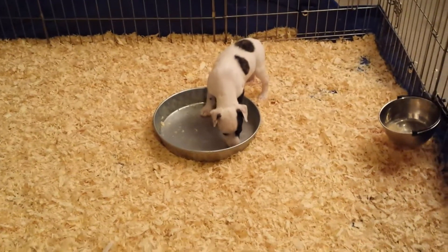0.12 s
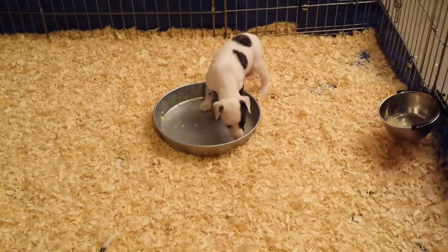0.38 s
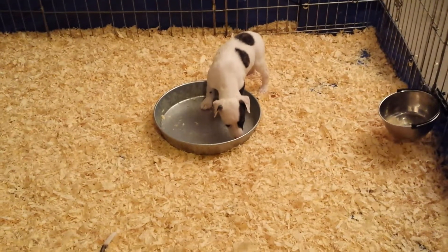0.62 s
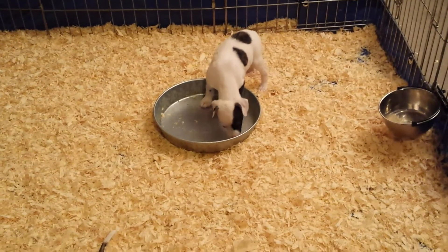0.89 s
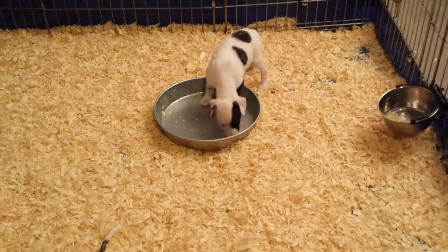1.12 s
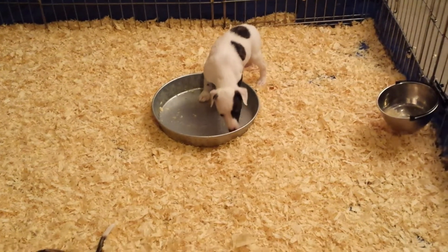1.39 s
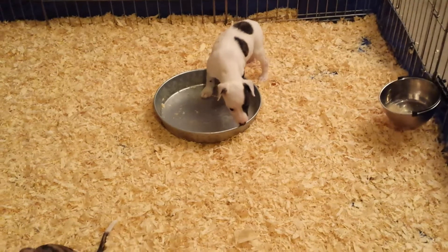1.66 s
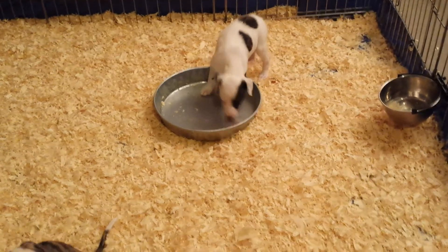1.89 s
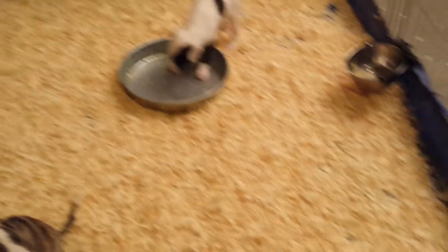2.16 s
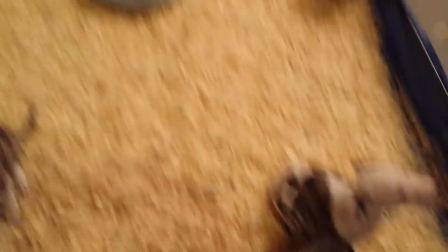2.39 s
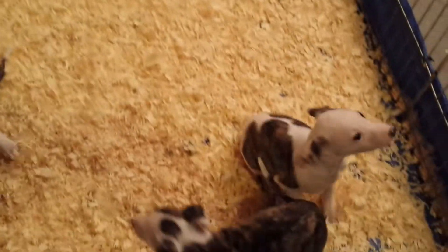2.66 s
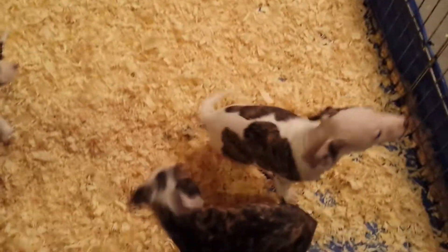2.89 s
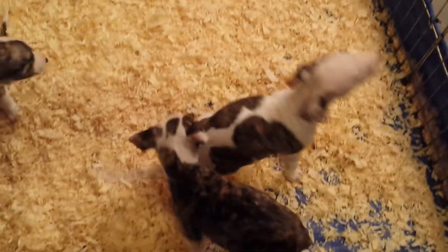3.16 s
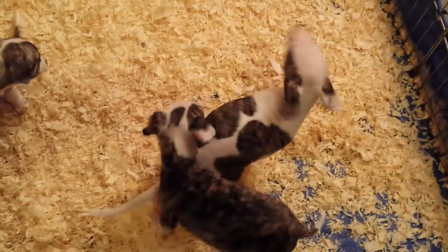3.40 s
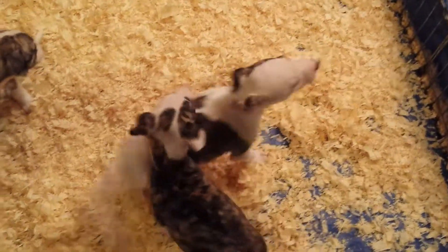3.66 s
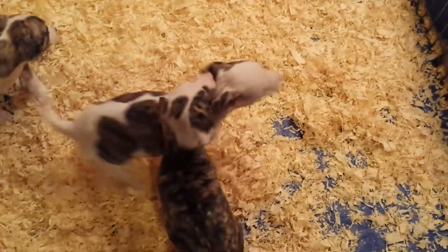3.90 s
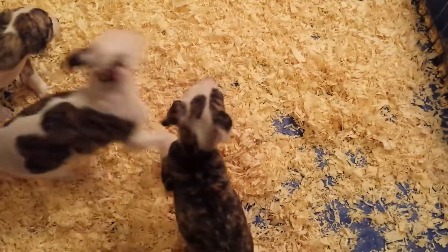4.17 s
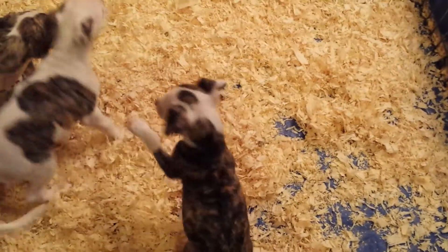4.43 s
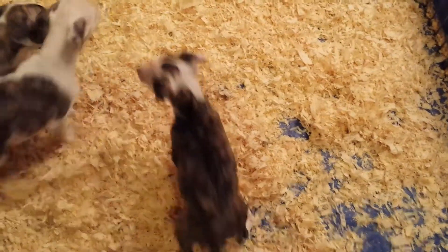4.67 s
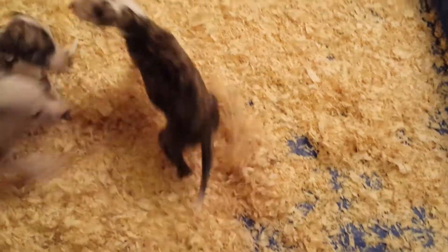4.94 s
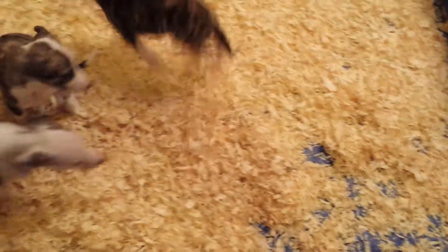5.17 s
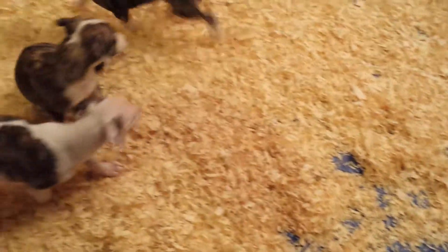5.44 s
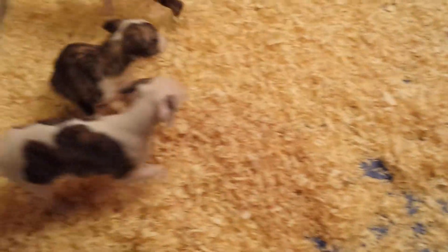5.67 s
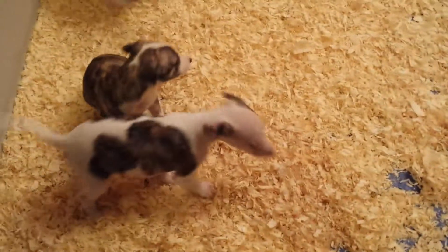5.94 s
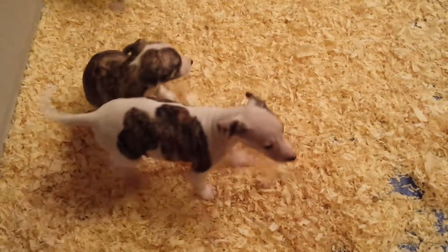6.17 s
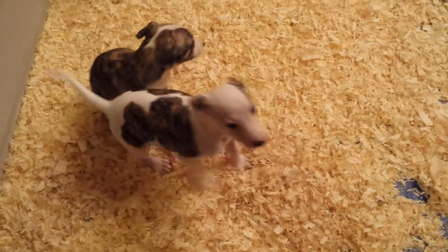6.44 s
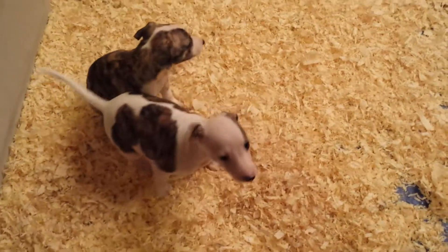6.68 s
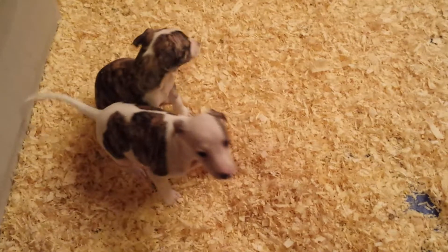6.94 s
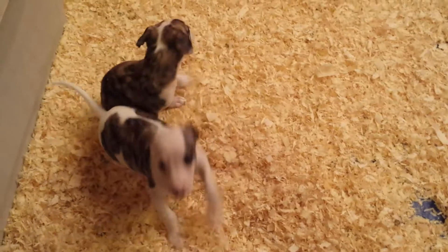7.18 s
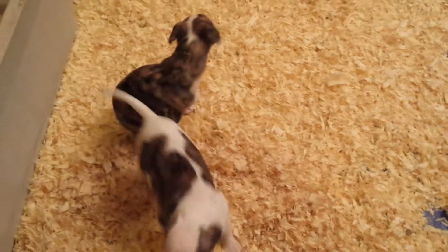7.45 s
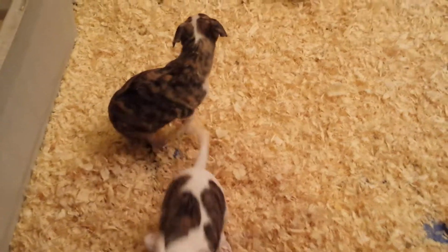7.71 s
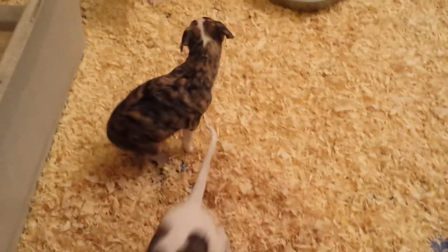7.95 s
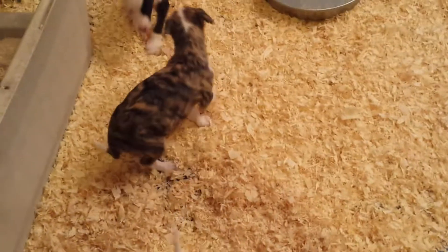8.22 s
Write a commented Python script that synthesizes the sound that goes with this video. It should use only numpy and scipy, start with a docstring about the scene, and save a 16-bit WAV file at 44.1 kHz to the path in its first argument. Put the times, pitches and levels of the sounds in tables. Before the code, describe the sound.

Crackly paw steps and sliding bodies on wood shavings, with a faint low room rumble. A hand bumps the microphone sharply, then puppies let out brief, high, bending whimpers, some hoarse. A scuffle brings soft thumps and a short grunt; two clusters of whines follow over nearer rustling, closing with a sudden crisp landing. Indoors, close and lightly reverberant.

```python
"""Indoors, in a wire pen: puppies whine in short squeaky notes while paws rustle and crunch dry wood shavings.
Voices are gliding harmonic series shaped by mouth and throat resonances, with a decaying room response.
Shavings are random impulses in filtered bands; slides of bodies or a sleeve and the floor are coarser and lower.
Body thumps and the partials of one short grunt are damped sines; a hand on the recorder adds knocks at the
right microphone, and ticks are single clicks with a damped ring, the loudest of them on the right."""
import sys
import numpy as np
from scipy import signal
from scipy.io import wavfile

SR = 44100
rng = np.random.default_rng(int(sys.argv[2]) if len(sys.argv) > 2 else 0)


def level_to_linear(level):
    """Convert decibel levels to linear amplitude factors, elementwise."""
    exponent = np.asarray(level, float) / 20
    return 10 ** exponent


def int16_out(signal):
    """Quantize to a 16-bit WAV file."""
    q = np.round(np.clip(np.atleast_2d(signal).T, -1, 1) * 32767)
    wavfile.write(sys.argv[1], SR, q.astype(np.int16))


N = 367353

# Floor and handling rumble: t/s, level/dB, low weight/(dB per octave), left-right difference/dB
RUMBLE = [(0, -64, 3, 0), (1.6, -59.5, 1.5, 1.5), (2.1, -63.5, 5, -6), (2.37, -50, -3, -12),
          (2.55, -61.5, 6.5, -13.5), (2.99, -47.5, -2.5, -16), (3.25, -61.5, 3, -3), (4.1, -59, 2, -5),
          (4.9, -57, 0.5, -5.5), (5.9, -55, 1, 2.5), (6.8, -58.5, 4, -2), (7.1, -55, 8.5, -0.5),
          (7.45, -55, 6.5, 0), (7.8, -56.5, 3.5, -2), (8.33, -47.5, 1.5, 2)]
# Rumble spectrum: f/Hz, relative density/dB
RUMBLE_COLOUR = [(25, -25), (38, -13.5), (70, -2.5), (130, -2.5), (240, -1.5), (400, -8), (800, -12)]
HUM_HZ, HUM_WIDTH_HZ, HUM_DB = 242, 7.23, -68.5   # width of each of two cascaded resonators
# Left-right correlation of all banded noise: f/Hz, correlation coefficient/1
LIKENESS = [(60, 0.6593), (290, 0.5398), (640, 0.2895), (1400, 0.0125), (15000, .01)]

# Steady shuffle of bodies on the bedding: t/s, level/dB, left-right difference/dB
SCUFF = [(0, -64.5, -0.5), (.68, -66, -0.5), (.76, -73.5, -2.5), (.91, -65, 0), (1.0, -58.5, 7),
         (1.9, -63, 0.5), (2.2, -66, 0.5), (2.9, -60, -8.5), (3.5, -63.5, 0.5), (3.75, -57.5, 1.5),
         (4.2, -65.5, -3.5), (4.9, -57, 1.5), (5.4, -64, 0), (6.6, -61.5, -1), (7.5, -59, -2),
         (8.18, -56.5, 3.5), (8.33, -48.5, 0)]
# Shuffle spectrum: f/Hz, relative density/dB
SCUFF_COLOUR = [(250, -6), (500, -1), (1000, 0.5), (2400, 1), (3400, -7.5), (4700, -13), (7000, -35.5),
                (12000, -25)]
SCUFF_WEIGHT_DB = 1.5   # dB per octave towards the lows
# Something sliding: bodies on the bedding, or a sleeve rubbing (1.2-1.6 s and 2.3-2.6 s):
# t of peak/s, level/dB, 10 dB fall time/s, low weight/(dB per octave), left-right difference/dB
SLIDES = [(.56, -51, 0.0428, 3, -1.5), (1.23, -49, 0.0996, 1, 14), (1.42, -54.5, 0.1753, 4, 9),
          (2.115, -50, 0.0403, 0.5, 10.5), (2.31, -48.5, 0.0454, -0.5, -9.5), (2.41, -54, 0.0344, 1, -11),
          (2.52, -57, 0.0198, 1, -9), (3.352, -51.5, 0.052, -3.5, 2.5), (6.3, -53.5, 0.5217, 2, 6.5),
          (8.224, -44.5, 0.0252, 4.5, 0)]

# General stir of paws in the shavings: t/s, level/dB
RUSTLE = [(0, -54.5), (.45, -54), (.63, -43.5), (.7, -53), (.77, -65.5), (.92, -55.5), (1.32, -49.5),
          (1.87, -54), (2.1, -49), (2.24, -58), (2.5, -62.5), (2.95, -58), (3.5, -55), (3.7, -52.5),
          (4.05, -55), (4.2, -65.5), (4.5, -58.5), (4.72, -55), (4.8, -45), (4.97, -46.5), (5.4, -54.5),
          (5.75, -54), (5.96, -46), (6.2, -41.5), (6.39, -62), (6.47, -45.5), (6.6, -51), (6.7, -46.5),
          (7.02, -54), (7.14, -48.5), (7.42, -53), (7.6, -50.5), (8.17, -43), (8.33, -48.5)]
# Rustle spectrum: f/Hz, relative density/dB
RUSTLE_COLOUR = [(2500, -7), (4300, -4.5), (5500, -3.5), (6800, 2), (8500, -1), (10500, -0.5),
                 (14000, -6.5), (16000, -7)]
# Single paw steps: t of peak/s, level/dB, 10 dB fall time/s (sign ignored)
STEPS = [(0.136, -48.5, 0.0588), (.25, -44.5, 0.032), (.56, -40.5, -0.0001), (1.23, -53, 0.0566),
         (1.375, -44, 0.0335), (1.69, -46.5, 0.0166), (1.801, -42, -0.0077), (2.135, -47, 0.0216),
         (2.655, -55, -0.007), (2.921, -49.5, 0.061), (3.144, -47, 0.0024), (3.26, -48, 0.0216),
         (3.35, -48.5, 0.0944), (4.255, -51.5, 0.0751), (4.59, -43.5, 0.017), (4.646, -48.5, 0.0432),
         (4.889, -37.5, 0.0278), (4.93, -48, 0.0035), (5.19, -42.5, 0.0009), (5.32, -47, 0.037),
         (5.44, -43, 0.0146), (5.52, -44.5, 0.093), (5.676, -44, 0.0263), (6.07, -51, 0.0856),
         (6.312, -38, 0.0566), (6.41, -50, -0.0404), (6.44, -39.5, 0.0129), (6.871, -42.5, 0.0801),
         (6.955, -50, 0.163), (7.47, -45.5, 0.0858), (7.67, -42.5, 0.0245), (7.718, -44.5, 0.0206),
         (7.9, -46.5, 0.0908), (8.02, -47, 0.0145), (8.165, -39, 0.0088)]
RISE_SHARE = 0.8411   # rise time over fall time of a step or slide
# A pup lands close by
LANDING_S, LANDING_DB, LANDING_FALL_S, LANDING_RISE_SHARE = 8.2, -29, 0.08838, 0.02217
# Nearness of the paws: t/s, level of top sheen relative to the rustle/dB, left-right difference/dB
NEARNESS = [(0, -19.5, 0.5), (.86, -17.5, 4), (2.0, -26, 2), (2.04, 0.5, 1), (2.2, 1, -5.5),
            (2.28, -15, 5.5), (2.62, -20, 7.5), (3.16, -36.5, 4.5), (3.6, -10, 1), (4.5, -1.5, 1),
            (4.7, 6, 0), (5.3, 5.5, -5), (5.75, -1, -1), (5.96, 3.5, 8.5), (6.12, -0.5, 0), (6.8, -7, -6),
            (7.45, -2.5, -5), (8.33, -3, -5)]
SHEEN_PAN_DB = -17   # the sheen sits further right than the body of the rustle
SNAPS_PER_S, SNAP_DB = 50, 12.5   # lone flakes per channel; their gain before filtering

# A paw crushing shavings: t/s, level/dB, left-right difference/dB, rise plus decay time/s, lower band edge f/Hz
CRUNCHES = [(0.513, -46.5, 5, 0.01706, 393.6), (0.534, -34, 5.5, 0.0625, 4450),
            (0.715, -32, 16, 0.020238, 1229), (0.829, -45, 15.5, 0.004794, 1000),
            (0.929, -39.5, 21, 0.03843, 1244), (1.334, -33.5, 10, 0.017, 3466),
            (1.471, -38, 2, 0.04203, 4000), (1.782, -40, 10, 0.01397, 4000),
            (2.258, -44.5, 10.5, 0.01486, 4000), (2.373, -36, -21, 0.02106, 430),
            (2.375, -42.5, -20, 0.01677, 6007), (2.982, -35, -21.5, 0.026024, 713),
            (3.433, -42, 1.5, 0.02652, 1242), (4.568, -43, -4, 0.02942, 1476),
            (4.93, -42.5, 1.5, 0.05786, 301.3), (5.042, -29.5, -10, 0.006076, 4536),
            (6.165, -31, -21, 0.01439, 4000), (7.555, -42, 18, 0.01527, 200), (7.6, -42, 13, 0.01908, 200),
            (8.199, -18, -11, 0.02008, 5295)]
CRUNCH_RISE_SHARE = 0.3488   # of the length

# Bodies thumping on the floor; the group at 4.92-4.98 s is the partials of a short grunt:
# t/s, level/dB, f/Hz, left-right difference/dB, cycles to fall 30 dB/1
THUMPS_AND_GRUNT = [(0.514, -37.5, 623.9, 1.5, 14.5), (3.862, -38, 227.2, 1.5, 18.5),
                    (4.583, -33.5, 605.7, -12, 13), (4.623, -38, 187.7, -2, 16),
                    (4.791, -35.5, 223.7, 3.5, 12.5), (4.793, -39.5, 617.6, 4.5, 16),
                    (4.875, -41.5, 137.9, 1, 11), (4.924, -34.5, 745.5, 3.5, 39.5),
                    (4.932, -40, 1291, 0.5, 40), (4.946, -33.5, 828.5, 5, 45),
                    (4.95, -35.5, 210.4, 3.5, 10.5), (4.955, -36, 423, -4, 25.5),
                    (4.975, -34.5, 415, -1.5, 20.5), (5.335, -42, 228, 1.5, 8.5), (5.353, -34, 204.9, 1, 8),
                    (5.462, -38, 150.2, -9.5, 8), (7.557, -39.5, 191, 15, 14), (7.595, -40, 149.5, 16, 15)]
THUMP_SAG, THUMP_RISE = 0.01775, 0.1422   # share of pitch lost while dying; share of the cycles spent swelling
LOW_CUT_HZ = 45.46   # of thumps, grunt and knocks

# Dry ticks: t/s, peak level/dB, left-right difference/dB, ring f/Hz
TICKS = [(0.5433, -15.5, 2.5, 6800), (1.478, -23, 1.5, 6810), (1.9183, -28.5, 8.5, 3209),
         (2.0007, -10.5, -23, 6784), (2.0035, -4, -20, 6603), (2.9199, -19.5, -12.5, 6695),
         (2.9297, -25, -26, 6790), (2.948, -29, -17, 6800), (2.9654, -28.5, -19, 6800),
         (3.0018, -22.5, -5, 6800), (4.725, -36, 6, 1087), (4.96, -18.5, -7.5, 6800),
         (5.043, -20, -16, 6910), (5.056, -11, -16, 6927), (5.45, -24, -10, 6804),
         (5.7609, -36.5, -17, 6800), (6.1179, -16.5, -18, 6810), (6.1257, -17.5, -22.5, 6860),
         (7.478, -26.5, -5, 8000), (7.801, -21.5, -6, 7500), (8.1, -20.5, -5.5, 8010),
         (8.2025, -18.5, -15, 6800)]

# The hand bumping the recorder case: t/s, level/dB, f/Hz
KNOCKS = [(1.869, -37.5, 130), (1.9709, -17, 210.3), (1.9993, -11.5, 463.5), (2.0042, -7, 676.9),
          (2.014, -25.5, 189.9), (2.3344, -20.5, 920), (2.336, -26.5, 168.8), (2.342, -30, 110),
          (2.372, -21, 97.4), (2.384, -19.5, 797.4), (2.599, -39, 200), (2.761, -34.5, 125.2),
          (2.9, -31.5, 620.5), (2.919, -26.5, 701), (3.003, -24.5, 229.8), (3.401, -30.5, 200),
          (4.578, -33, 150), (4.79, -31.5, 400.2), (5.46, -35.5, 140), (8.201, -27, 242)]
# Cycles to fall 30 dB, then sag and rise as for the thumps, then left-right difference
KNOCK_TURNS, KNOCK_SAG, KNOCK_RISE, KNOCK_PAN_DB = 2.12, 0.5465, 0.07785, -30.5

# Whines, one curve each, the last from a fainter pup further off: t/s, fundamental f/Hz, level/dB
WHINES = [
    [(3.108, 707.6, -32.5), (3.114, 554.5, -34.5), (3.136, 603.8, -30.5), (3.147, 642.9, -33),
     (3.152, 815.4, -37), (3.165, 810.1, -51.5), (3.186, 800.8, -49.5), (3.197, 780.3, -31),
     (3.218, 775.9, -32), (3.243, 833.3, -42), (3.261, 804.5, -45), (3.271, 773.2, -27),
     (3.279, 712.3, -38), (3.285, 645.7, -32.5), (3.296, 540.7, -39)],
    [(3.636, 603.8, -46), (3.662, 661.6, -32.5), (3.669, 499.9, -35), (3.692, 504.1, -35.5),
     (3.698, 561.1, -34), (3.704, 579.6, -30.5), (3.709, 583.6, -42), (3.715, 590.3, -29),
     (3.723, 621.6, -38.5), (3.73, 623.5, -31.5), (3.735, 614.6, -40), (3.739, 604.4, -32.5),
     (3.745, 591.6, -37.5), (3.755, 583.9, -37), (3.77, 570.6, -37), (3.781, 532.2, -41.5),
     (3.787, 509.6, -40), (3.84, 510.5, -52)],
    [(6.12, 1308, -42.5), (6.13, 1309, -37), (6.158, 1416, -38), (6.179, 1418, -37), (6.183, 1204, -29.5),
     (6.187, 954.8, -39.5), (6.212, 853.1, -32), (6.224, 840.6, -37.5), (6.252, 864.7, -33.5),
     (6.28, 874.3, -36.5), (6.31, 884.4, -27), (6.322, 865.3, -33), (6.326, 790.1, -42.5),
     (6.331, 744.5, -29.5), (6.337, 749.1, -39), (6.35, 883.9, -43), (6.372, 866.1, -46)],
    [(6.662, 1647, -53.5), (6.67, 1549, -32.5), (6.674, 1036, -40), (6.73, 1032, -36.5), (6.745, 1000, -41),
     (6.815, 957.3, -40), (6.83, 887, -32.5), (6.835, 861.6, -37.5), (6.839, 738.4, -31.5),
     (6.845, 725, -31), (6.85, 699.4, -45.5)],
    [(7.057, 672.7, -33.5), (7.063, 557.9, -40.5), (7.073, 500.6, -36), (7.11, 594.1, -30),
     (7.124, 746.8, -31), (7.157, 765.8, -40)],
    [(7.157, 756.5, -46.5), (7.166, 743.1, -28.5), (7.172, 574.7, -30.5), (7.187, 589.5, -31),
     (7.202, 615.3, -25.5), (7.22, 607.9, -36), (7.25, 591.9, -33.5), (7.265, 585.3, -28),
     (7.283, 578, -27), (7.3, 576.9, -39), (7.335, 578.7, -49), (7.345, 578.8, -64), (7.385, 578.1, -61.5)],
    [(3.088, 1066, -59.5), (3.1, 1082, -50.5), (3.14, 1087, -49), (3.19, 1077, -57)],
]
# Left-right difference of each whine/dB
WHINE_PANS_DB = [0.8466, 1, -2.5, 0.5, -2, -3.5, 2]
# Lead of the left microphone in each whine/ms
WHINE_LEADS_MS = [.06, .03, -.025, -.05, -.06, -.06, 0]
# Mouth resonance of each whine: f at start/Hz, f at end/Hz, overtone level before lift/dB
VOICING = [(1443.7, 1597.8, -46), (1569.5, 964.8, -47.5), (1861.5, 1468.7, -46), (2120, 1823, -52),
           (1000, 1369.3, -37), (1143.8, 1952.7, -44), (2000, 1973, -80)]
# Throat ring of each whine: f at start/Hz, f at end/Hz, level at start/dB, level at end/dB, before lift
THROAT = [(4000, 3980, -54, -60), (3795.7, 4050, -54.5, -56), (4235.3, 3739, -38, -44),
          (4000, 3810.4, -35.5, -36.5), (3380, 4062.5, -46.5, -43.5), (3462.4, 4364, -47.5, -46),
          (4000, 3990, -81.5, -79.5)]
# Mouth opening, one curve per whine: t/s, lift of all overtones/dB
OPENING = [
    [(3.145, -5), (3.155, 2.5), (3.2, -1.5), (3.262, 1.5), (3.278, -7)],
    [(3.655, -8), (3.668, 0.5), (3.7, 2), (3.72, -3), (3.76, -3), (3.79, 1), (3.81, -8)],
    [(6.12, -5), (6.175, 2.5), (6.23, 3), (6.27, -3.5), (6.318, -2.5), (6.326, -6)],
    [(6.676, 0), (6.73, -3), (6.745, 4.5), (6.815, -1), (6.832, -7)],
    [(7.06, -4), (7.11, 2.5), (7.13, -2.5), (7.157, -3.5)],
    [(7.16, 0.5), (7.2, -2.5), (7.235, 5), (7.258, 0.5), (7.285, 0), (7.32, -6.5)],
    [(3.088, -0.5), (3.19, 1.5)],
]
# Hoarseness, one curve per whine: t/s, roughness before voice breaks add to it/1
HOARSENESS = [
    [(3.11, .1), (3.25, .08), (3.275, .45)],
    [(3.64, .35), (3.74, .3), (3.765, .12), (3.8, .3)],
    [(6.12, .08), (6.3, .1), (6.325, .45)],
    [(6.67, .1), (6.815, .12), (6.835, .55)],
    [(7.06, .12), (7.105, .15), (7.12, .3), (7.157, .2)],
    [(7.16, .6), (7.19, .5), (7.203, .08), (7.3, .08)],
    [(3.088, .45), (3.19, .45)],
]
MOUTH_HALF_WIDTH_HZ, THROAT_HALF_WIDTH_HZ = 183.6, 401.16   # to half the peak amplitude
UPPER_RING_HZ, UPPER_RING_DB = 4920.5, -16   # second, fainter throat ring, relative to the first
OVERTONE_DB, OVERTONE_WAVER_DB, RASP_HZ = -28.5, 3.5, 99.88   # overtone re fundamental, before division by k
OVERTONE_FOLLOWS, VOICE_DB = .5, -35   # share of the fundamental's swings about its usual level
BREAK_ROUGH_PER_OCTAVE_S, BREAK_LINGER_S = .012, .008   # fast glides break the voice, and the break lingers
BREAK_DULL_DB = 12   # resonance lift lost at a full break
HOARSE_RAD = 2.4   # phase smear of the second harmonic per unit roughness

# Nasal whistle before one whine: t/s, f/Hz, level/dB, left-right difference/dB
WHISTLE = [(6.607, 9029, -49.5, -21.5), (6.622, 8962, -35, -18.5), (6.662, 9047, -29.5, -21.5),
           (6.668, 9015, -35, -16.5)]

ROOM_T60_S, WALL_CUT_HZ, ROOM_DB = 0.30432, 2745, -10   # low-frequency decay time
MIC_RING_HZ, MIC_RING_WIDTH_HZ, MIC_RING_DB = 6649.5, 1441.9, 2.5   # ring added to the direct sound
LEFT_DULL_HZ, TOP_HZ = 9261, 14700   # left low-pass corner; edge of the stop band


def rms_one(x):
    """Normalization: scales to unit rms."""
    return x / np.sqrt(np.mean(x ** 2) + 1e-20)


def in_time(rows, t=None):
    """Linear interpolation: the columns of a table at times t, or at every sample."""
    s, *columns = np.transpose(rows)
    t = np.arange(N) / SR if t is None else t
    return [np.interp(t, s, column) for column in columns]


def at_hz(points, hz):
    """Logarithmic frequency scale: reads a spectrum at hz."""
    f, values = np.array(points).T
    return np.interp(np.log(hz), np.log(f), values)


def placed(pan_db):
    """Interaural level difference: left and right gains with constant total power."""
    left = 1 / np.sqrt(1 + level_to_linear(-2 * np.asarray(pan_db)))
    return np.sqrt(2) * np.array([left, np.sqrt(1 - left ** 2)]).reshape(2, -1)


def drift(rate):
    """Low-pass random process: slow chance with spread 1, rate in Hz, drawn at every 40th sample."""
    r = np.exp(-80 * np.pi * rate / SR)
    slow = signal.lfilter([1], [1, -2 * r, r * r], rng.standard_normal(N // 40 + 2002))[2000:]
    return np.interp(np.arange(N) / 40, np.arange(len(slow)), rms_one(slow))


def resonate(x, hz, width_hz):
    """Damped resonance: a two-pole filter with gain 1 on top."""
    r = np.exp(-np.pi * width_hz / SR)
    poles = [1, -2 * r * np.cos(2 * np.pi * hz / SR), r * r]
    return signal.lfilter([(1 - r * r) / 2, 0, (r * r - 1) / 2], poles, x)


def bell(hz, centre_hz, half_width_hz):
    """Resonance curve: gain 1 at the centre, half at the half width."""
    return 1 / (1 + ((hz - centre_hz) / half_width_hz) ** 2)


def band(x, low_hz, high_hz):
    """Band limitation: a Butterworth band-pass."""
    return signal.sosfilt(signal.butter(2, [low_hz, min(high_hz, 19000)], "band", fs=SR, output="sos"), x)


def split_filter(x, kind, order, hz):
    """Frequency selection: a Butterworth low-pass or high-pass."""
    return signal.sosfilt(signal.butter(order, hz, kind, fs=SR, output="sos"), x)


def swell(s, fall_s, rise_share=RISE_SHARE):
    """Exponential envelope: gain rises to 1 at a moment and then fades."""
    t = np.arange(N) / SR - s
    return level_to_linear(-10 * np.maximum(t, -t / rise_share) / abs(fall_s))


def add(out, s, sound, level_db, pan_db):
    """Superposition: mixes a short sound in at a moment."""
    i = round(s * SR)
    out[:, i:i + sound.shape[-1]] += (level_to_linear(level_db) * sound * placed(pan_db))[:, :N - i]


def grains(per_s, spread_db):
    """Random impulse process: signed grains with a long tail of sizes, as two unrelated stereo pairs."""
    shape = (2, 2, N)
    sizes = level_to_linear(spread_db * np.minimum(rng.exponential(1, shape), 5))
    signs = np.sign(rng.random(shape) - .5)
    return sizes * signs * (rng.random(shape) < per_s / SR)


def banded(source, colour, level_band, patchy_db, slope_db=0, pivot_hz=2600):
    """Subband synthesis: flickering half-octaves with set level and correlation; rms 1 in the level band."""
    out, together = 0, drift(12.717)
    octaves = np.log2(colour[-1][0] / colour[0][0])
    edges = colour[0][0] * 2 ** np.arange(0, octaves + .4, .5)
    for k, (low, high) in enumerate(zip(edges, edges[1:])):
        mid, side = band(source[k % 2], low, high)   # neighbouring bands use unrelated draws
        hz = np.sqrt(low * high)
        alike = np.clip(at_hz(LIKENESS, hz), -1, 1)
        lean_db = slope_db * np.log2(pivot_hz / hz)
        flicker_db = patchy_db * (1.3373 * together + drift(6.324))
        stereo = np.sqrt(1 + alike) * mid + np.sqrt(1 - alike) * side * [[1], [-1]]
        out = out + level_to_linear(at_hz(colour, hz) + lean_db + flicker_db) * stereo
    return out / np.std(band(out.mean(axis=0), *level_band))


def rumble():
    """Filtered noise: lumpy lows, with narrow-band resonance giving a faint wavering hum."""
    level_db, weight_db, pan_db = in_time(RUMBLE)
    noise = rng.standard_normal((2, 2, N))
    low = banded(noise, RUMBLE_COLOUR, (40, 400), patchy_db=2.0, slope_db=weight_db, pivot_hz=200)
    hum = resonate(rng.standard_normal(N), HUM_HZ, HUM_WIDTH_HZ)
    hum = resonate(hum, HUM_HZ, HUM_WIDTH_HZ)
    return level_to_linear(level_db) * low * placed(pan_db) + level_to_linear(HUM_DB) * rms_one(hum)


def scuff():
    """Sliding friction: coarse impulses whose low weight and place are power-weighted means of all slides."""
    level_db, pan_db = in_time(SCUFF)
    powers = [level_to_linear(2 * level_db)]
    for s, slide_db, fall_s, *_ in SLIDES:
        powers.append((level_to_linear(slide_db) * swell(s, fall_s)) ** 2)
    power = np.sum(powers, axis=0)
    shares = np.array(powers) / power
    steady = [SCUFF_WEIGHT_DB * shares[0], pan_db * shares[0]]
    weight_db, mean_pan_db = np.transpose(SLIDES)[3:] @ shares[1:] + steady
    drag = banded(grains(6000, 1.08), SCUFF_COLOUR, (2100, 3300), patchy_db=1.2, slope_db=weight_db)
    return np.sqrt(power) * drag * placed(mean_pan_db)


def rustle():
    """Brittle fracture: dense flake snaps swell with each step; near paws add sheen at the very top."""
    power = level_to_linear(2 * in_time(RUSTLE)[0])
    for s, step_db, fall_s in STEPS:
        power += (level_to_linear(step_db) * swell(s, fall_s)) ** 2
    power += (level_to_linear(LANDING_DB) * swell(LANDING_S, LANDING_FALL_S, LANDING_RISE_SHARE)) ** 2
    flakes = banded(grains(5000, 3.28), RUSTLE_COLOUR, (5000, 9000), patchy_db=1.0)
    lone = grains(SNAPS_PER_S, 3.85)[0]
    flakes = flakes + level_to_linear(SNAP_DB) * band(lone, 4587, 13270)
    top = split_filter(flakes, "high", 4, 10000)
    body = split_filter(flakes, "low", 4, 10000)
    sheen_db, pan_db = in_time(NEARNESS)
    sheen = level_to_linear(sheen_db) * rms_one(top) * placed(SHEEN_PAN_DB)
    return np.sqrt(power) * (body + sheen) * placed(pan_db)


def crunches():
    """Crushing of a brittle bed: a burst of snaps swells as the paw sinks in, then dies away."""
    out, t = np.zeros((2, N)), np.arange(SR // 3) / SR
    snaps = grains(14000, 1.808)[0]
    for s, level_db, pan_db, length_s, low_hz in CRUNCHES:
        i = min(round(s * SR), N - len(t))
        burst = rms_one(band(snaps[:, i:i + len(t)], low_hz, min(4.444 * low_hz, 11000)))
        rise_s = CRUNCH_RISE_SHARE * length_s
        rise = np.sin(np.pi / 2 * np.minimum(t / rise_s, 1))
        decay = np.exp(-np.maximum(t - rise_s, 0) / (length_s - rise_s))
        add(out, s, burst * rise * decay, level_db, pan_db)
    return out


def damped_sines(rows, sag, rise):
    """Damped free vibration: each row is a decaying sine, sagging and a little unsteady in pitch."""
    out, t = np.zeros((2, N)), np.arange(SR // 4) / SR
    wobble = drift(65.87)
    for s, level_db, hz, pan_db, turns in rows:
        i = min(round(s * SR), N - len(t))
        done = t * hz / turns   # 1 when the sine has fallen 30 dB
        pitch = hz * (1 - sag * np.minimum(done, 1)) * (1 + 0.1395 * wobble[i:i + len(t)])
        phase = 2 * np.pi * np.cumsum(pitch) / SR
        shape = np.minimum(done / rise, 1) * level_to_linear(-30 * done)
        add(out, s, -np.sin(phase) * shape, level_db, pan_db)
    return split_filter(out + 1e-18, "high", 2, LOW_CUT_HZ)


def thumps_and_grunt():
    """Damped modes: soft blows on the floor last several cycles; a short grunt is a group of such partials."""
    return damped_sines(THUMPS_AND_GRUNT, THUMP_SAG, THUMP_RISE)


def ticks():
    """Impulse response: a hard snap is one click through two heavily damped resonances."""
    out = np.zeros((2, N))
    for s, level_db, pan_db, hz in TICKS:
        ring = resonate(signal.unit_impulse(SR // 100), hz, hz)   # width equals pitch
        ring = resonate(ring, hz, hz)
        add(out, s, ring / np.abs(ring).max(), level_db, pan_db)
    return out


def knocks():
    """Strong damping: knocks on the recorder case die almost at once, dropping in pitch."""
    rows = [(*row, KNOCK_PAN_DB, KNOCK_TURNS) for row in KNOCKS]
    return damped_sines(rows, KNOCK_SAG, KNOCK_RISE)


def whines():
    """Source-filter principle: the folds give near-sine notes; mouth and throat lift overtones near them."""
    out = np.zeros((2, N))
    shake, wavers = drift(99.43), [drift(22.34) for k in range(12)]
    blurs = [drift(69.27) for k in range(12)]   # breath noise smears each overtone
    # Rough folds beat against each other
    rasp = np.sin(2 * np.pi * np.cumsum(RASP_HZ * (1 + 0.2517 * drift(24.317))) / SR)
    linger = np.exp(-1 / (BREAK_LINGER_S * SR))
    settings = zip(WHINES, VOICING, OPENING, HOARSENESS, THROAT, WHINE_PANS_DB, WHINE_LEADS_MS)
    for note, (start_hz, end_hz, mouth_db), opening, hoarse, throat, pan_db, lead_ms in settings:
        at = slice(round(note[0][0] * SR), round(note[-1][0] * SR))
        t = np.arange(at.start, at.stop) / SR
        hz, level_db = in_time(note, t)
        opening_db, = in_time(opening, t)

        octaves_per_s = np.abs(np.gradient(np.log2(hz), t))
        glide = signal.lfilter([1 - linger], [1, -linger], octaves_per_s)
        broken = np.minimum(BREAK_ROUGH_PER_OCTAVE_S * glide, 1)
        rough = np.clip(in_time(hoarse, t)[0] + broken, 0, .7)

        phase = 2 * np.pi * np.cumsum(hz * (1 + .04 * rough * shake[at])) / SR
        phase = phase + 2 * np.pi * hz * [[lead_ms / 1000], [0]]   # left channel leads
        mouth_hz = np.linspace(start_hz, end_hz, len(t))
        ring_hz, ring_db = np.linspace(throat[::2], throat[1::2], len(t)).T
        lift_db = OVERTONE_FOLLOWS * (level_db - VOICE_DB) - BREAK_DULL_DB * broken
        voice = level_to_linear(level_db) * np.sin(phase)
        for k in range(2, 12):
            mouth = level_to_linear(mouth_db + lift_db) * bell(k * hz, mouth_hz, MOUTH_HALF_WIDTH_HZ)
            ring = bell(k * hz, ring_hz, THROAT_HALF_WIDTH_HZ)
            ring += level_to_linear(UPPER_RING_DB) * bell(k * hz, UPPER_RING_HZ, THROAT_HALF_WIDTH_HZ)
            ring *= level_to_linear(ring_db + lift_db)
            strength = mouth + ring + level_to_linear(level_db + OVERTONE_DB) / k
            waver = level_to_linear(opening_db + OVERTONE_WAVER_DB * wavers[k][at])
            smear = HOARSE_RAD * np.sqrt(k / 2) * rough * blurs[k][at]
            voice += strength * waver * np.sin(k * phase + k + smear)
        unsteady = 1 + .8 * rough * rasp[at]
        fade = np.clip(np.minimum(t - t[0], t[-1] - t) / 0.001992, 0, 1)
        out[:, at] += np.sqrt(2) * unsteady * fade * voice * placed(pan_db)
    return out


def whistle():
    """Aerodynamic tone: air through a narrowed nostril gives one clean high line."""
    t = np.arange(N) / SR
    hz, level_db, pan_db = in_time(WHISTLE)
    fade = np.clip(np.minimum(t - WHISTLE[0][0], WHISTLE[-1][0] - t) / 0.00313, 0, 1)
    tone = np.sin(2 * np.pi * np.cumsum(hz) / SR)
    return np.sqrt(2) * level_to_linear(level_db) * fade * tone * placed(pan_db)


def room(x):
    """Reverberation with wall absorption: six feedback delays a side, duller on every round."""
    out, dull = np.zeros((2, N)), np.exp(-2 * np.pi * WALL_CUT_HZ / SR)
    lags = (rng.uniform(0.01, .035, 12) * SR).astype(int)
    for k, lag in enumerate(lags):
        loop, state = x.copy(), [0.]
        gain = level_to_linear(-60 * lag / SR / ROOM_T60_S)
        for i in range(lag, N, lag):
            back, state = signal.lfilter([gain * (1 - dull)], [1, -dull], loop[i - lag:i], zi=state)
            loop[i:i + lag] += back[:N - i]
        out[k % 2] += (loop - x) * (-1) ** (k // 2)
    return out


def scene():
    """Superposition of sources: whines and whistle ring on in the room; all other sounds stay dry."""
    voices = whines() + whistle()
    wet = level_to_linear(ROOM_DB) * room(voices.mean(axis=0) + 1e-18)
    bedding = rumble() + scuff() + rustle() + crunches()
    return voices + wet + bedding + thumps_and_grunt() + ticks() + knocks()


def band_limit(x):
    """A steep low-pass at the top of the band."""
    return signal.sosfilt(signal.butter(12, 15650, fs=SR, output="sos"), x)


def record(dry):
    """Microphone response: the ports lift a treble peak, the left is duller; peaks clip at full scale."""
    x = dry + level_to_linear(MIC_RING_DB) * resonate(dry, MIC_RING_HZ, MIC_RING_WIDTH_HZ)
    left = split_filter(x[0], "low", 2, LEFT_DULL_HZ)
    x = signal.sosfilt(signal.cheby2(22, 45, TOP_HZ, fs=SR, output="sos"), [left, x[1]])
    return band_limit(np.clip(x, -1, 1))


dry = scene()
out = record(dry)
int16_out(out)
```